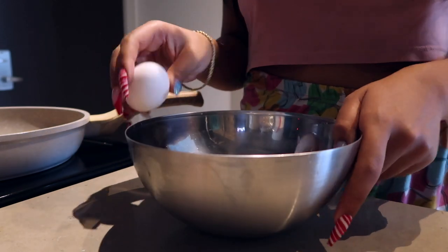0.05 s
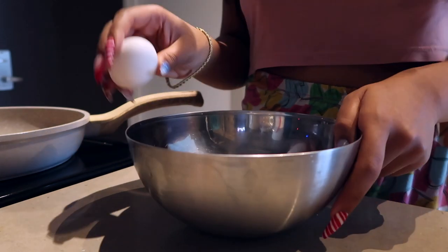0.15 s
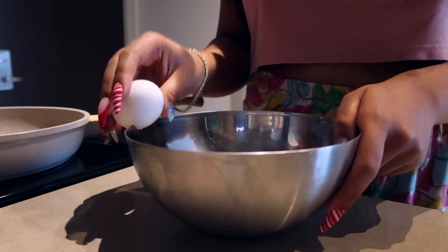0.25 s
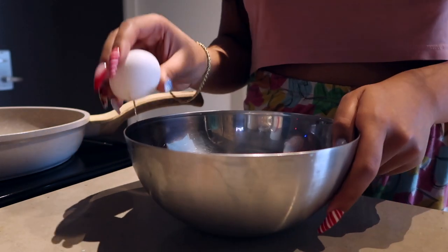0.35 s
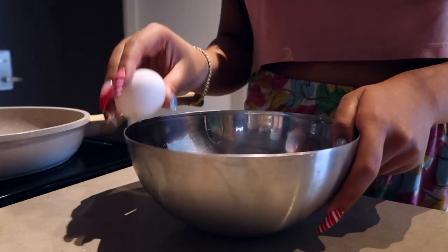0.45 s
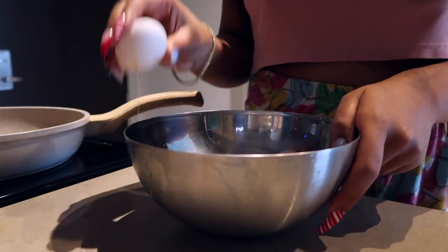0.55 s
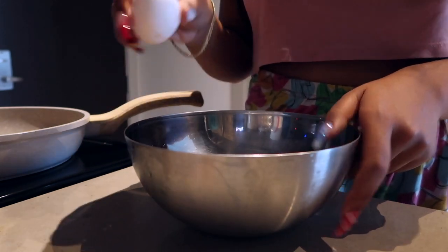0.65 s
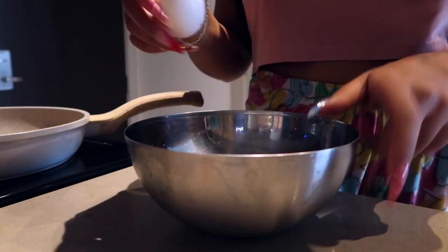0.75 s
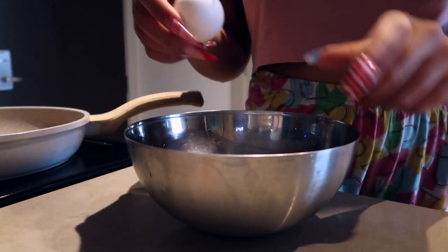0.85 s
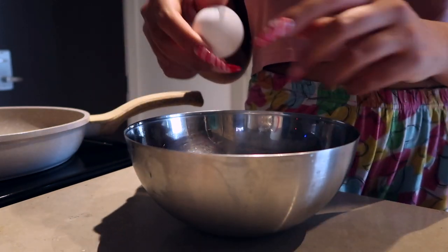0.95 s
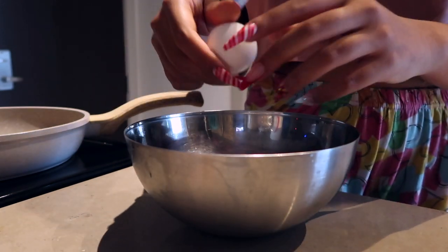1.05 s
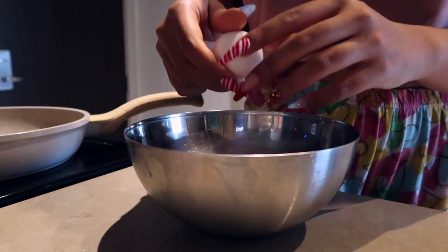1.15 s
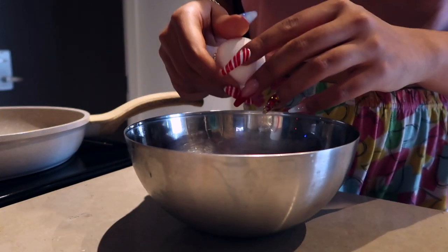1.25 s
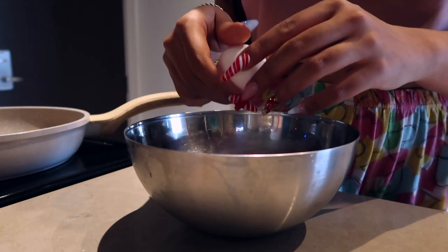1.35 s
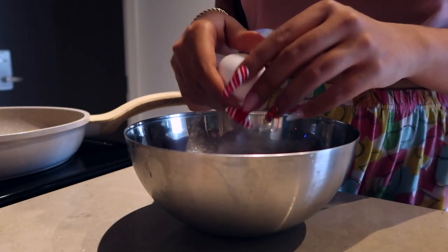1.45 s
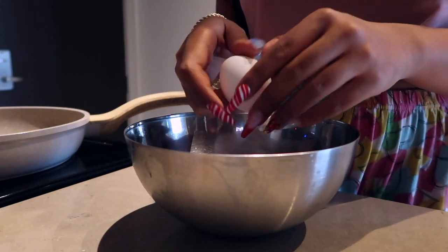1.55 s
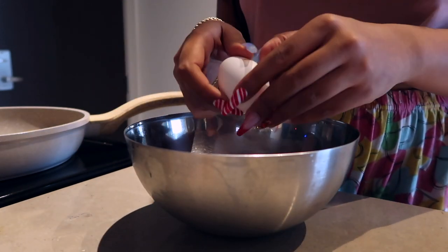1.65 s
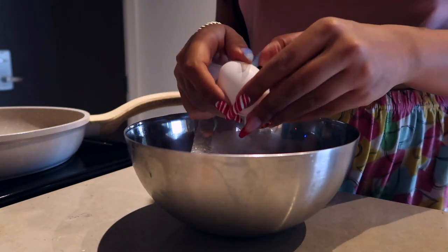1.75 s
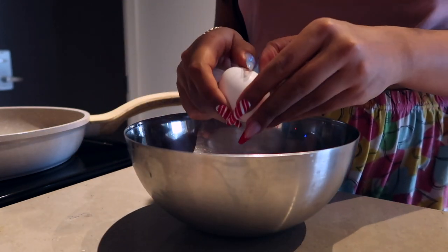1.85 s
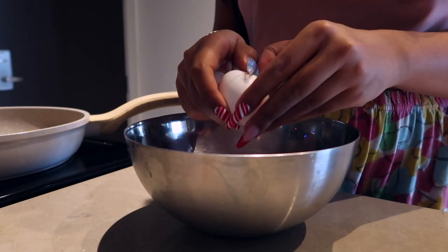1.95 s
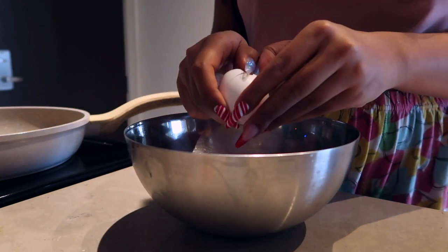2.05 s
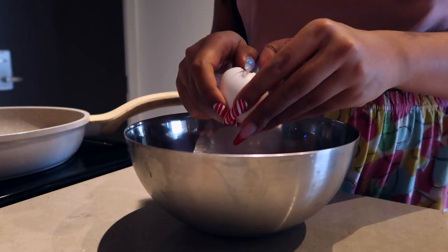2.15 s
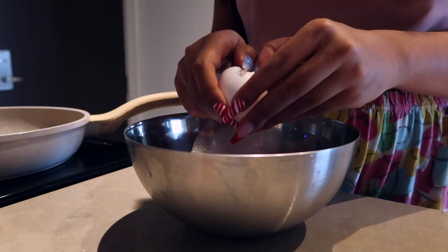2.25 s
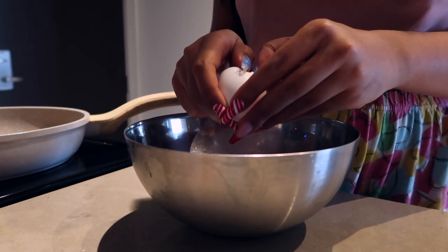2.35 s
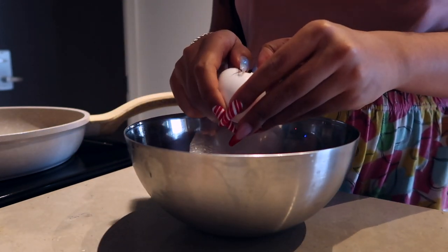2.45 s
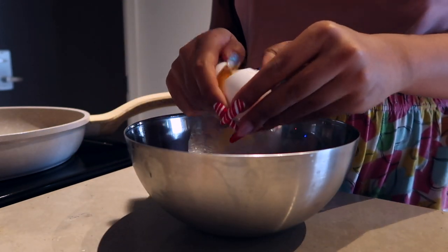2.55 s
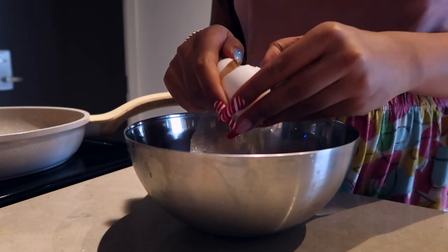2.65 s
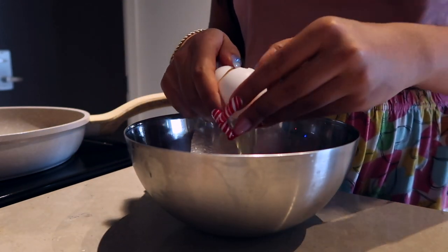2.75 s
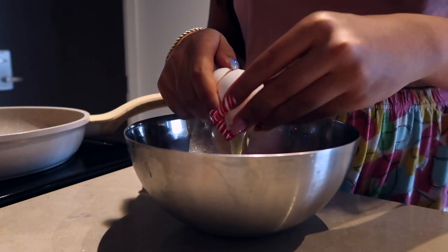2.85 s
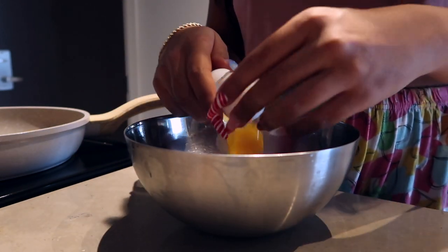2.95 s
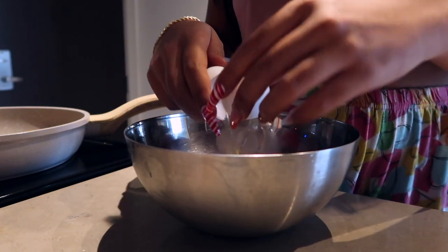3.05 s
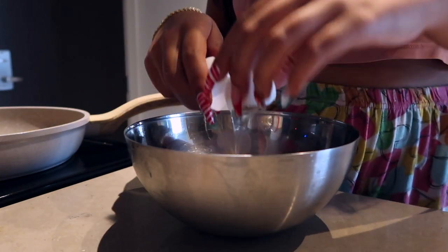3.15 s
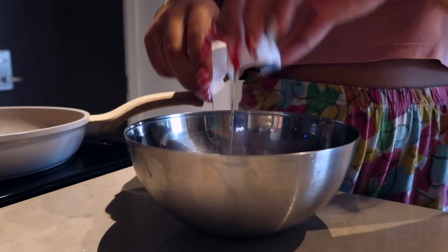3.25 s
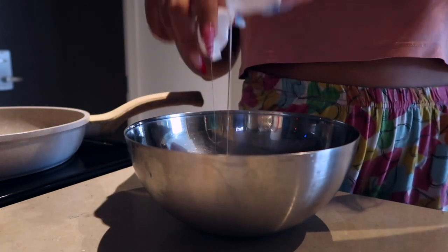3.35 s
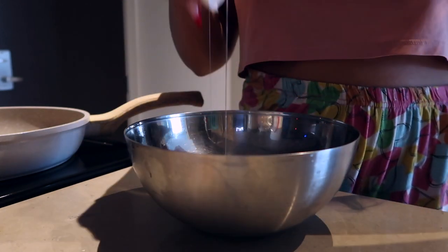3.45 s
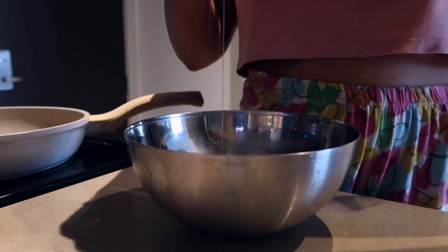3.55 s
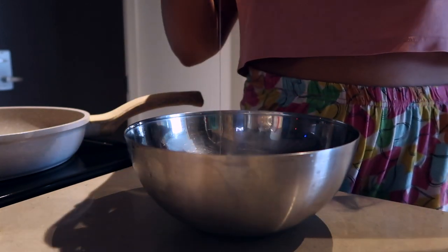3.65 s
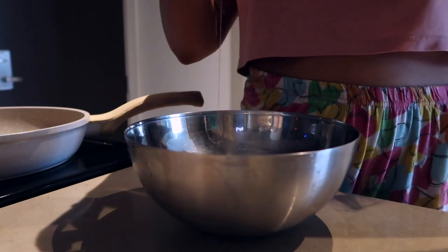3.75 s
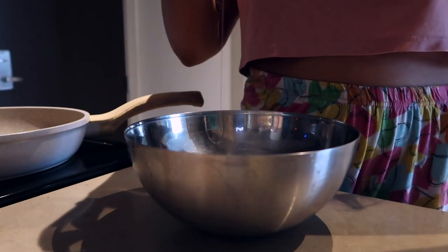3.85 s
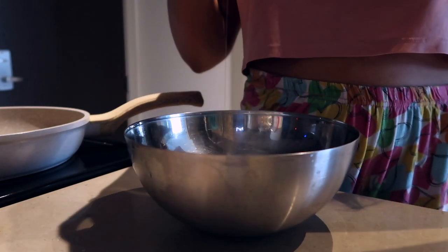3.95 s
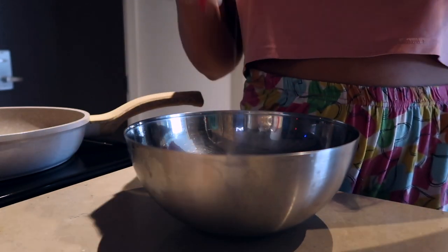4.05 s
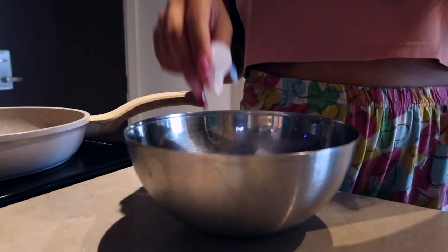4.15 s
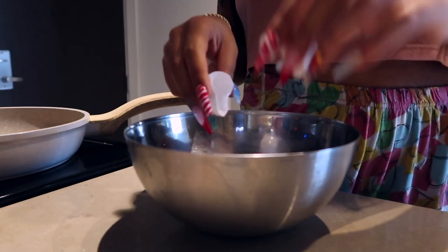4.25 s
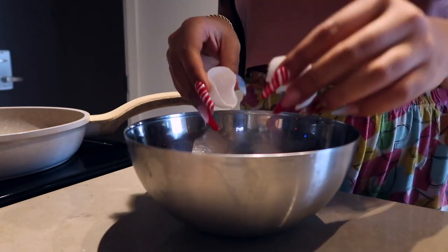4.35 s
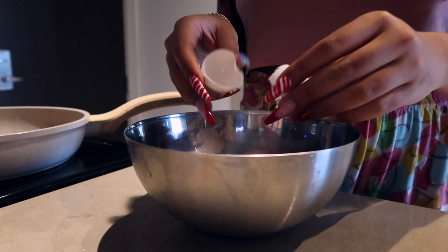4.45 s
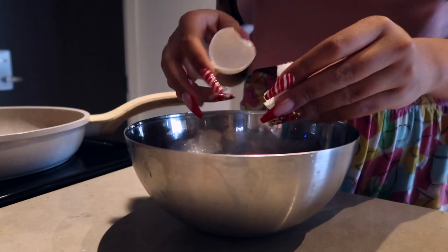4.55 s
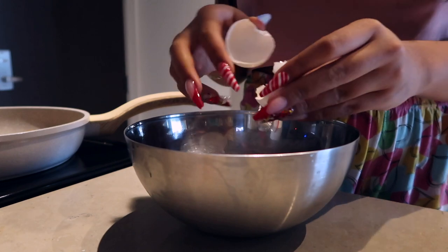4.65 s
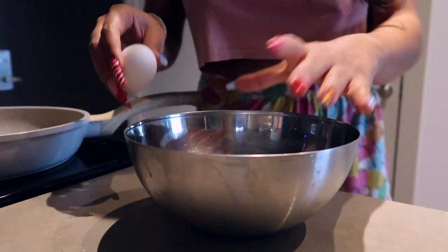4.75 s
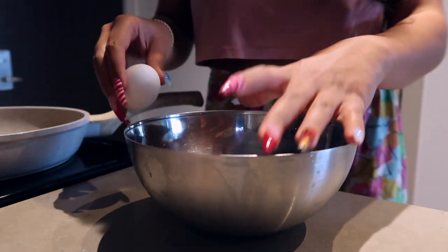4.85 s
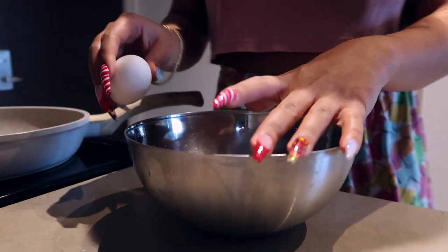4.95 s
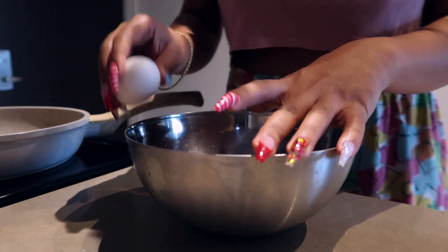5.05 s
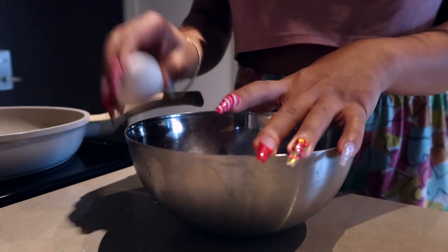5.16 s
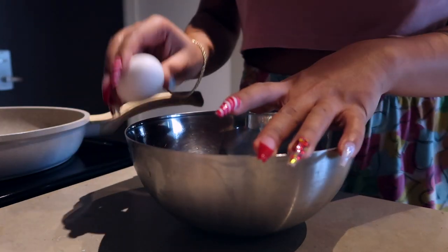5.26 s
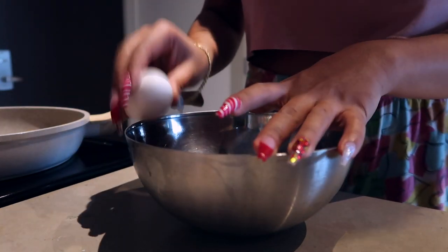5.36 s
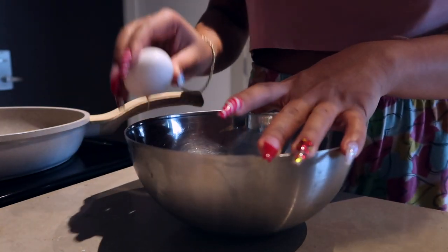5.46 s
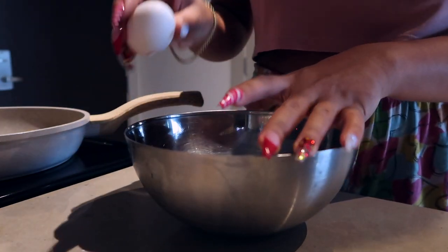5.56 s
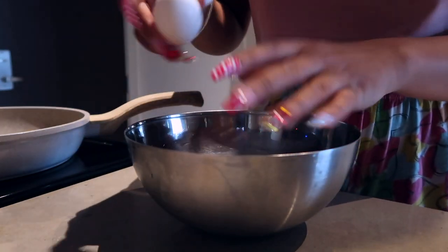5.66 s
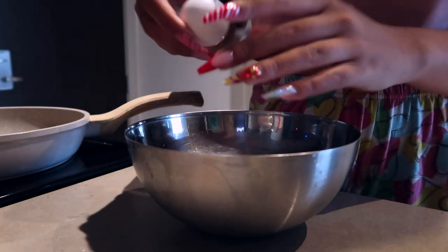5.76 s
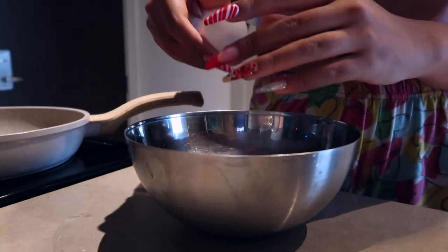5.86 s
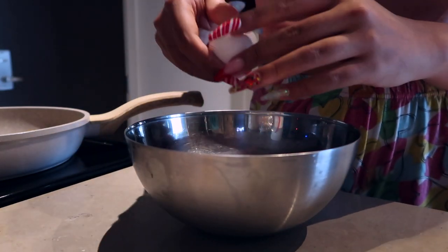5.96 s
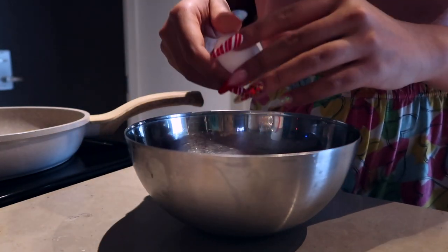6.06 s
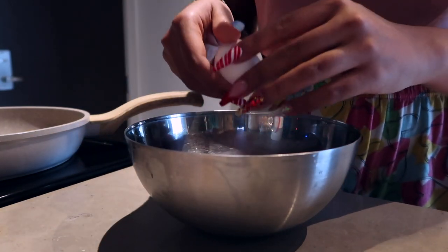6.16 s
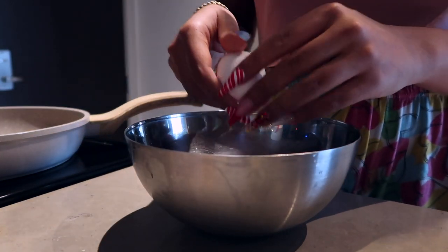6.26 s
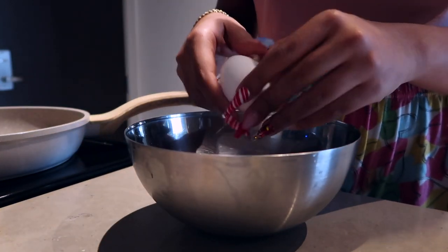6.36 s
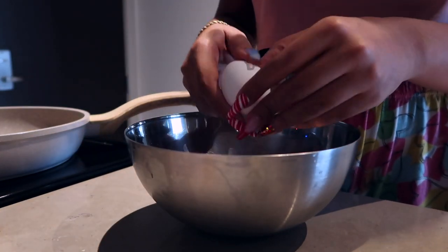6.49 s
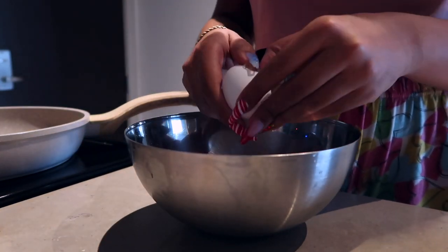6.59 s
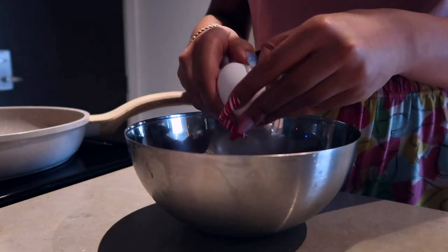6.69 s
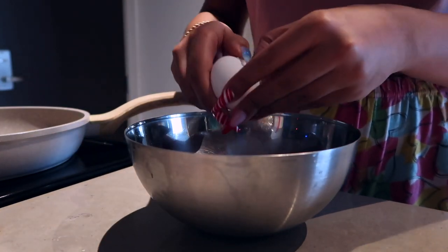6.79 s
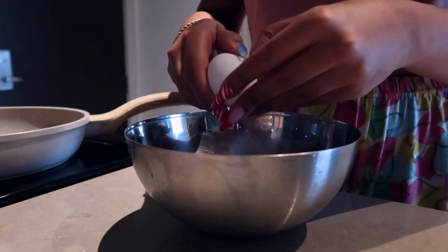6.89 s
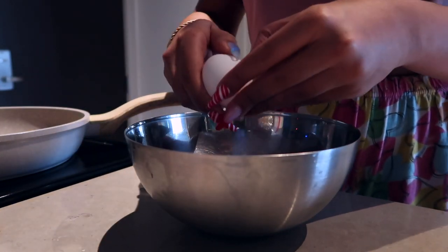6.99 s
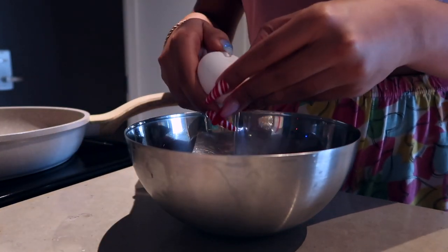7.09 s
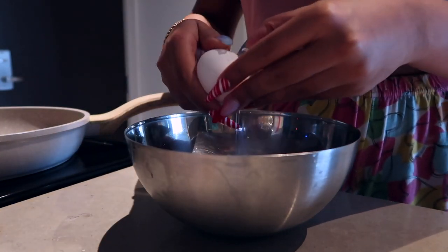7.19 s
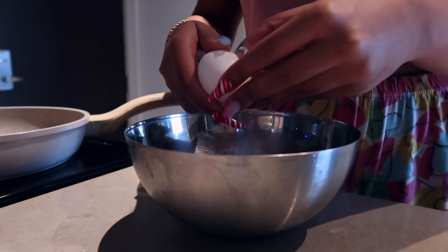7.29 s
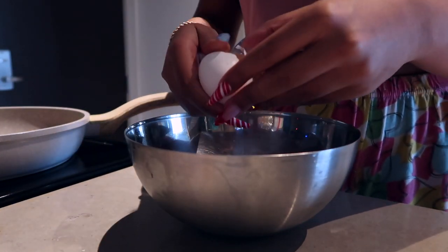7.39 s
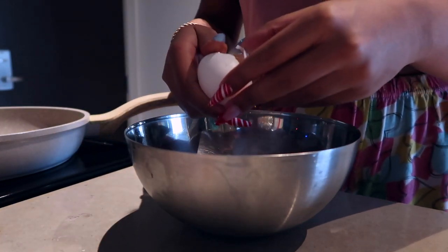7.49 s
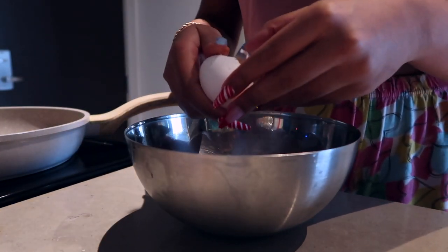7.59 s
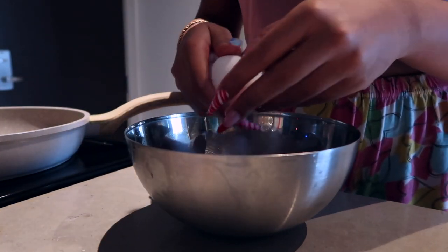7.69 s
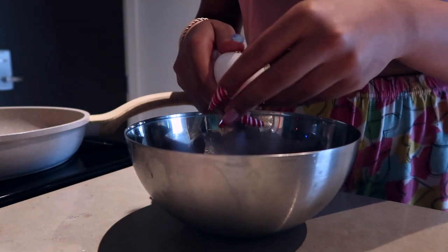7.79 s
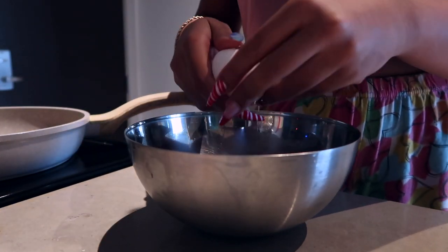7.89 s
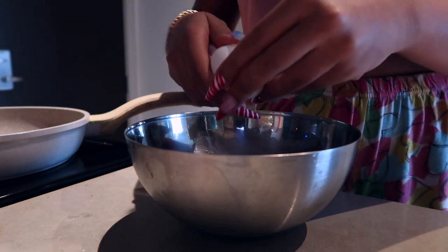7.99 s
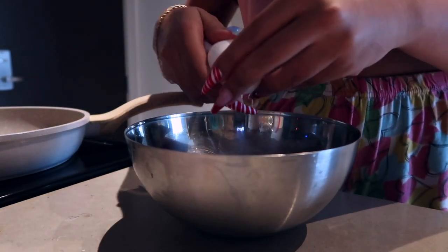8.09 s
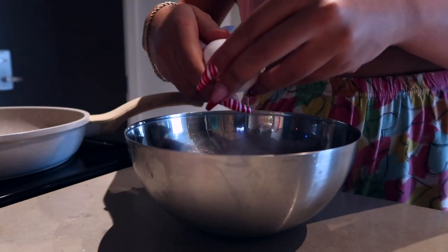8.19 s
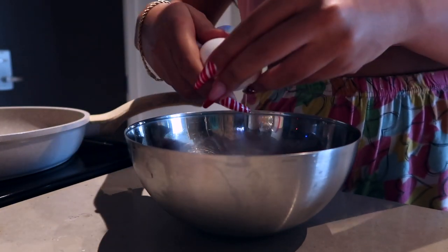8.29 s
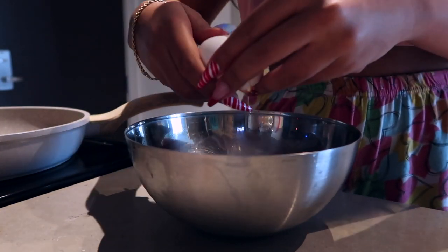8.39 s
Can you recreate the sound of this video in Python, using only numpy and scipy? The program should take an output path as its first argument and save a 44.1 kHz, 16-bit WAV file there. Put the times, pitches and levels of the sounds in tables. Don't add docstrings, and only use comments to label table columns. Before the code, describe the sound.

Eggs knock sharply on a steel bowl's rim, then shells snap, crackle and tear wetly open over a faint low kitchen hum.

```python
import sys
import numpy as np
from scipy import signal
from scipy.fft import rfft, irfft, next_fast_len
from scipy.io import wavfile
from scipy.ndimage import uniform_filter1d

SR = 44100
rng = np.random.default_rng(int(sys.argv[2]) if len(sys.argv) > 2 else 0)


def pcm_store(signal):
    levels = np.round(np.clip(np.atleast_2d(signal), -1, 1) * 32767)
    wavfile.write(sys.argv[1], SR, levels.astype(np.int16).T)


def makeup_ratio(level_db):
    decades = np.asarray(level_db, float) / 20
    return 10 ** decades


N = 371763

# f/Hz, likeness
LIKENESS = [(60, 1.0), (130, 1.0), (290, 0.93), (640, 0.7), (1410, 0.57), (3100, 0.47), (6820, -0.22),
            (15000, -0.51)]


def rms_one(x):
    return x / np.sqrt(np.mean(x ** 2) + 1e-20)


def peak_one(x):
    return x / np.max(np.abs(x))


def level(rows):
    return makeup_ratio(np.interp(np.arange(N) / SR, *np.transpose(rows), left=-200, right=-200))


def at_hz(points, hz):
    table_hz, values = np.transpose(points)
    return np.interp(np.log(hz), np.log(table_hz), values)


def shaped(x, spectrum):
    hz = np.fft.rfftfreq(N, 1 / SR) + 1
    return irfft(rfft(x) * makeup_ratio(at_hz(spectrum, hz)), N)


def band(x, low_hz, high_hz):
    return signal.sosfilt(signal.butter(2, [low_hz, high_hz], "band", fs=SR, output="sos"), x)


def cut_below(x, hz):
    return signal.sosfilt(signal.butter(4, hz, "high", fs=SR, output="sos"), x)


def ring(clicks, hz, t60):
    r, w = makeup_ratio(-60 / (t60 * SR)), 2 * np.pi * hz / SR
    return signal.lfilter([0, np.sin(w)], [1, -2 * r * np.cos(w), r * r], clicks + 1e-18)


def splinters(draw, seconds, rise_s=0.0022):
    t = np.arange(draw.shape[1]) / SR
    uneven = draw[0] * np.exp(0.55 * draw[1])
    spray = uneven * (1 - np.exp(-t / rise_s)) * np.exp(-t / max(seconds, 1e-4))
    return spray / np.sqrt(np.sum(spray ** 2))


def two_paths(voice, blow):
    straight = peak_one(voice(blow, 1))
    around = voice(np.arange(len(blow)) == 0, .45)
    return np.array([straight, around * np.sqrt(np.sum(straight ** 2) / np.sum(around ** 2))])


def add(out, s, sound):
    at = round(s * SR)
    out[:, at:at + sound.shape[1]] += sound[:, :N - at]


def squeezes(rows):
    t = np.arange(N) / SR
    return sum(makeup_ratio(db - 20 * np.maximum((s - t) / swell_s, (t - s) / fade_s)) for s, db, swell_s, fade_s in rows)


def narrow_noise(hz, width_hz, steady):
    bins = np.fft.fftfreq(N, 1 / SR)
    wander = np.fft.ifft(np.fft.fft(rng.standard_normal(N)) / (1 + (2 * bins / width_hz) ** 2))
    carrier = np.exp(2j * np.pi * hz * np.arange(N) / SR)
    return rms_one(np.real((wander + steady * wander.std()) * carrier))


def background():
    # f/Hz, level/dB per Hz
    air_colour = [(13, -47.5), (22, -11), (54, -15), (117, -9), (163, -3.5), (233, -11), (382, -16.5),
                  (414, -17.5), (502, -21.5), (1080, -26), (1820, -34), (4040, -38.5), (10800, -45.5),
                  (13100, -45.5), (15500, -78)]
    # f/Hz, width/Hz, steadiness, level before 4.77 s/dB, level after/dB
    hum_bands = [(28, 9.5, 3.0, -59, -57), (61, 5, 5.2, -49.5, -59.5), (116.2, 5, 2.2, -55.5, -53.5),
                 (173.3, 14, 1.56, -44.5, -44.5), (232, 17, 0.46, -48, -50), (301.5, 6, 1.4, -60.5, -56.5),
                 (422, 9, 1.1, -62, -61.5), (1070, 6.8, 6, -62, -61.5)]
    # t/s, level/dB
    drone = [(0.0, -59.5), (4.8, -57), (5.0, -43.5), (5.6, -41.5), (6.5, -41), (6.83, -79), (7.6, -50.5),
             (8.43, -44.5)]
    alike = np.clip(at_hz(LIKENESS, np.fft.rfftfreq(N, 1 / SR) + 1), -1, .975)
    mid, side = rfft([shaped(white, air_colour) for white in rng.standard_normal((2, N))])
    air = irfft(np.sqrt(1 + alike) * mid + np.sqrt(1 - alike) * side * [[1], [-1]], N)
    switch_s, glide_s = 4.77, 0.14
    after = np.clip((np.arange(N) / SR - switch_s) / glide_s, 0, 1)
    hum = level(drone) * narrow_noise(149.3, 3, 8.7)
    for hz, width_hz, steady, db, late_db in hum_bands:
        hum += makeup_ratio(db + (late_db - db) * after) * narrow_noise(hz, width_hz, steady)
    return makeup_ratio(-42) * rms_one(air) + hum


def snap_rows():
    # t/s, peak level/dB, shell ring f/Hz, hollow level/dB, tick level/dB
    prises = [(0.0569, -40.5, 2300, 11, -1.5), (0.113, -47.5, 1460, 23, -18.5), (1.4885, -52, 1610, -5, -6),
              (1.5696, -26.5, 2800, -3, -6), (1.5787, -23.5, 2550, -9, -6),
              (2.0505, -14.5, 2660, -8, -17.5), (2.2144, -47, 2590, 7, -9), (2.53, -42, 1560, 9, -4),
              (2.5729, -18.5, 2620, -0.5, -16), (2.5850, -19.5, 3200, 0, -7.5),
              (2.6, -12.5, 2650, -19.5, -21.5), (2.8393, -29, 1810, -5, -32),
              (2.9755, -20.5, 1810, -18, -30), (3.35, -41.5, 2740, -4.5, -13),
              (3.705, -45, 1830, -9, -13.5), (4.95, -42.5, 1480, 6, -12), (5.005, -21.5, 2660, -10, -30.5),
              (6.274, -38, 1720, 1, -13), (6.416, -33, 3340, 4.5, -21), (7.8435, -44, 3000, 0, -15),
              (7.9768, -30.5, 1780, -8, -29.5), (7.998, -20.5, 3430, -14, -14),
              (8.051, -23.5, 4000, -9.5, -16.5)]
    # t/s, peak level/dB, shell ring f/Hz
    dry_cracks = [(1.1915, -45.5, 2090), (1.427, -42, 3200), (1.68, -37, 2670), (1.8624, -31.5, 1840),
                  (2.2598, -34.5, 2630), (2.273, -38, 1740), (2.554, -30.5, 4420), (3.058, -33.5, 2190),
                  (3.111, -36.5, 1840), (3.2527, -38, 2220), (6.0767, -36.5, 3170), (6.1407, -45.5, 1720),
                  (6.2106, -41, 2300), (6.241, -41, 1710), (6.297, -34, 3000), (6.4015, -40.5, 3370),
                  (6.4555, -29.5, 2480), (6.6873, -45, 2630), (6.755, -33.5, 2700), (6.7765, -35, 2340),
                  (6.7913, -27.5, 3020), (7.015, -35.5, 2200), (7.186, -35.5, 2900), (7.927, -39.5, 3260),
                  (7.9722, -22.5, 2100), (8.2352, -38, 2000), (8.2745, -19, 2200), (8.2513, -33, 5260),
                  (8.3076, -22, 2300), (8.3255, -28, 2590)]
    # t/s, peak level/dB, shell ring f/Hz, splinter time/s
    torn = [(1.3524, -30.5, 1800, 0.003), (2.7615, -28, 3450, 0.0055), (1.9036, -39, 1790, .0015),
            (2.593, -5, 3170, 0.00059), (2.6064, -13, 2720, 0.004), (2.6682, -36, 2740, .0018),
            (2.725, -29, 2020, 0.0039), (2.813, -40, 1860, 0.001), (2.91, -20.5, 1870, 0.0034),
            (2.9656, -15, 1716, 0.0085), (3.0213, -20, 2350, 0.0021), (3.0805, -27.5, 1680, 0.0018),
            (3.236, -31.5, 2270, 0.0049), (3.2933, -37.5, 2800, .0015), (3.546, -36.5, 2440, .0012),
            (3.567, -38, 2650, .0014), (3.632, -40.5, 2350, .0015), (3.6488, -39, 2730, 0.0017),
            (5.0795, -41.5, 4900, 0.0011), (7.0506, -23.5, 3420, 0.0028), (7.072, -31, 3180, .0018),
            (7.268, -38, 1820, .0022), (8.037, -28.5, 1780, 0.00082), (8.2674, -22, 1810, 0.0014),
            (8.3401, -13.5, 3360, 0.0014), (8.3604, -20, 3290, 0.0016), (8.383, -30.5, 3120, 0.0031),
            (8.3928, -16, 3310, 0.0029), (8.2925, -12, 2240, 0.0013), (8.418, -22, 2100, 0.002)]
    # t/s, peak level/dB, shell ring f/Hz
    wet = [(2.6444, -26, 2060), (2.691, -24.5, 2040), (1.7404, -40, 1730), (2.7806, -35, 3260),
           (3.145, -29.5, 2800), (4.496, -25, 3050), (6.8125, -30, 2600), (7.0378, -20.5, 3520),
           (7.059, -19, 3250), (7.0914, -42, 3570), (7.123, -34, 2050), (7.171, -29, 1610),
           (7.203, -32, 1490), (7.338, -23.5, 1810), (7.365, -31, 1880), (7.418, -33.5, 1710),
           (7.514, -33, 1780), (7.537, -30, 1820), (7.559, -36, 1900), (7.716, -27, 2060),
           (7.7295, -28.5, 1740), (7.7651, -18, 1840), (8.372, -33, 3240), (8.2825, -22, 2310),
           (8.407, -12, 2990)]
    faint_db = -26.5
    return ([(*row, 0.0042) for row in prises]
            + [(*row, faint_db, -12, 0.0047) for row in dry_cracks]
            + [(s, db, hz, faint_db, -25, splinter_s) for s, db, hz, splinter_s in torn]
            + [(*row, faint_db, -43, 0.0023) for row in wet])


def snaps():
    # f/Hz, t60/s, level/dB
    hollow_modes = [(496, 0.29, -7.5), (560, 0.049, -2), (749.5, 0.088, 2)]
    # f/Hz, t60/s, level/dB
    egg_modes = [(1750, 0.037, -27.5), (2660, 0.013, -28.5), (3300, 0.0077, -25), (4800, 0.0012, -31.5),
                 (6110, 0.0038, -32.5)]
    rise_s = .0004
    scatter_db = 2.5
    out, rows = np.zeros((2, N)), snap_rows()
    for s, db, hz, hollow_db, tick_db, splinter_s in rows:
        draw = rng.standard_normal((3, 3000))
        blow, grit = splinters(draw, splinter_s, rise_s), splinters(draw[1:], splinter_s, rise_s)
        cycles = 24 + max(-24 - tick_db, 0)

        def shell_voice(x, sharp):
            return band(ring(x, hz, sharp * cycles / hz), .75 * hz, 1.4 * hz)

        def hollow_voice(x, sharp):
            return sum(makeup_ratio(d + scatter_db * chance) * ring(x, f, sharp * t60)
                       for (f, t60, d), chance in zip(hollow_modes, draw[2]))

        def crack_voice(x, sharp):
            body = sum(makeup_ratio(d) * ring(x, f, sharp * t60) for f, t60, d in egg_modes)
            return cut_below(band(x, 1400, 5000) + body, 1800)

        snap = two_paths(shell_voice, blow) + makeup_ratio(hollow_db) * two_paths(hollow_voice, blow)
        snap += makeup_ratio(0.58 * tick_db + 11.0) * two_paths(crack_voice, grit)
        snap += makeup_ratio(tick_db + 12.5) * two_paths(lambda x, sharp: band(x, 3600, 14000), grit)
        add(out, s, makeup_ratio(db - 4.0) * snap)
    return cut_below(out, 320)


def knocks():
    # t/s, level/dB, crush time/s, crack level/dB, crack top f/Hz
    rim_knocks = [
        (.3002, 4.5, 0.00096, 0.5, 5840),
        (5.2390, -0.5, 0.0013, -21.5, 7000),
        (5.4222, -5, 0.0067, -29, 4600),
    ]
    # f/Hz, t60/s, level/dB at knocks 1, 2 and 3
    bowl_modes = [(553, 0.032, -11, -5.5, -4), (387, 0.088, -19, -22.5, -23), (470, .04, -5, -10, -16),
                  (657, 0.033, -13.5, -5, -9), (786, 0.069, -8.5, -4.5, -33), (842, 0.045, -11, -8.5, -22),
                  (990, 0.023, -7.5, -10.5, -15.5), (1320, 0.0078, -4.5, -10.5, -8.5),
                  (1810, 0.019, 0, -2, -5.5), (2100, 0.014, -2, 1.5, -4.5), (2820, 0.013, -16, 0.5, -8),
                  (3280, 0.016, -12, -8.5, -11), (3920, 0.018, -10, -1, -29), (5420, .005, -16, -8, -14),
                  (8980, 0.0081, -11, -8.5, -13.5)]
    out = np.zeros((2, N))
    for k, (s, db, crush_s, crack_db, top_hz) in enumerate(rim_knocks):
        blow = splinters(rng.standard_normal((2, 6000)), 0.33 * crush_s)
        parts = [makeup_ratio(crack_db) * two_paths(lambda x, sharp: band(x, 1100, top_hz), blow)]
        for hz, t60, *mode_db in bowl_modes:
            low = hz < 1100
            blow = splinters(rng.standard_normal((2, 6000)), crush_s)
            blow = np.roll(blow, int(0.00059 * SR) * low)
            held_s = min(t60, (60 if low else 26) / hz)
            mode = two_paths(lambda x, sharp: ring(x, hz, sharp * held_s), blow)
            parts.append(makeup_ratio(mode_db[k]) * mode)
        straight, around = np.swapaxes(parts, 0, 1)
        spread = irfft(np.sqrt(np.sum(np.abs(rfft(around)) ** 2, 0)))
        add(out, s, makeup_ratio(db) * np.array([straight.sum(0), np.roll(spread, 130)]))
    return cut_below(out, 330) + band(out, 50, 180)


def clean_breaks():
    # t/s, peak level/dB, low ring f/Hz, high ring f/Hz, high ring level/dB
    breaks = [(0.3006, -8, 1670, 1292, -9), (1.5712, -17, 725, 1770, -3.5), (1.5800, -28, 775, 3300, 9.5),
              (1.8629, -24.5, 1780, 2660, 4.5), (1.9040, -34, 2600, 3300, -3),
              (2.0508, -21.5, 722, 2710, 6), (2.5525, -23.5, 4130, 5200, -1), (2.5870, -21, 636, 3100, 7),
              (2.594, -6, 2820, 3300, -1), (2.6, -13, 2540, 2900, 2), (2.608, -12, 2560, 2980, -1),
              (2.6300, -21, 2900, 3300, -2), (2.638, -26, 2800, 2500, -4), (2.6600, -26, 2300, 2700, 1),
              (2.7630, -23.5, 1850, 3520, 2), (2.7830, -29, 2000, 3400, -4),
              (2.8385, -29.5, 1740, 2900, 4.5), (4.4973, -25, 2950, 3400, 2.5),
              (5.2395, -7, 720, 2100, -4.5), (5.4222, -18.5, 620, 3010, 2), (7.1135, -27.5, 2000, 2180, -8),
              (7.1185, -15.5, 2020, 2200, -12), (7.166, -21.5, 1720, 2100, -7),
              (8.2633, -7, 1810, 2100, 0.5), (8.275, -23, 2100, 3100, -3), (8.282, -22, 2190, 2500, -3),
              (8.291, -4, 2194, 3400, 0.5), (8.3080, -24, 2200, 3000, -3), (8.3260, -27, 2500, 3000, -2),
              (8.3405, -21, 3200, 2800, -6), (8.36, -21, 3200, 3900, 1), (8.3685, -12, 3180, 2720, -4),
              (8.3797, -13, 3100, 2400, -7), (8.3899, 0.5, 3190, 2850, -5), (8.4058, -11, 3040, 2600, -7.5),
              (8.4136, -1, 2075, 3220, -10), (8.4165, -9, 2075, 2400, -9.5)]
    rebound_s, longest_s = .0011, 0.035
    out, blow = np.zeros((2, N)), np.zeros(2500)
    blow[[0, round(rebound_s * SR)]] = 1, -.6
    crack = makeup_ratio(-9) * two_paths(lambda x, sharp: band(band(x, 2300, 6200), 1500, 9000), blow)

    def piece(hz):
        t60 = min(40 / hz, longest_s)
        return two_paths(lambda x, sharp: band(ring(x, hz, sharp * t60), 0.77 * hz, 1.5 * hz),
                         np.arange(2500) == 0)

    for s, db, low_hz, high_hz, high_db in breaks:
        high = piece(high_hz) + crack * (high_hz > 2300)
        add(out, s, makeup_ratio(db - 6) * (piece(low_hz) + makeup_ratio(high_db) * high))
    return out


def shards():
    # t/s, peak level/dB, low edge f/Hz, high edge f/Hz
    thin_shards = [(2.7010, -38, 2200, 4500), (2.7240, -31, 2500, 4500), (2.7560, -34, 1600, 4500),
                   (2.8393, -29, 2700, 4200), (2.9075, -21, 1700, 4000), (2.9114, -20, 2200, 5500),
                   (2.9660, -17, 2230, 4200), (2.9770, -18.5, 2380, 4200), (3.0202, -25, 2000, 4500),
                   (6.7520, -39, 2122, 3600), (6.7930, -34, 2400, 3600), (6.8130, -26, 2200, 3600),
                   (7.0170, -30, 2000, 2900), (7.1660, -28.5, 2000, 4500), (7.2060, -34, 1500, 3300),
                   (7.7657, -28, 3000, 7500), (7.9020, -44, 2200, 3800), (7.9635, -29, 1800, 4200),
                   (7.9685, -20.5, 1800, 4500), (7.973, -27, 2000, 4800), (7.9975, -13, 1700, 5000),
                   (8.0395, -40, 2800, 4000), (8.051, -27, 2000, 6200), (8.2745, -26, 3500, 7000),
                   (8.2912, -10, 3400, 5900), (8.3090, -27, 3200, 7000), (8.3405, -26, 3500, 7000),
                   (8.3685, -19, 2600, 4800), (8.3901, -6, 3600, 6200), (8.4136, -13.5, 3200, 5500),
                   (5.4223, -16, 2300, 3500), (0.3008, -13.5, 5020, 7500), (0.3012, -22.5, 8930, 15000),
                   (5.2398, -19.5, 8000, 15000), (5.2430, -24.5, 8000, 15040), (5.4240, -28, 8000, 15000),
                   (3.0220, -38, 9000, 15000), (3.0590, -40, 8500, 15000), (7.1880, -39, 8950, 15000),
                   (8.2640, -25, 9000, 15500), (8.3905, -21, 9000, 15500), (8.2845, -33, 9000, 15500),
                   (4.955, -45.5, 5800, 8000), (8.2920, -25, 8000, 15000), (2.5870, -24, 3500, 6000),
                   (2.6050, -26, 3500, 6500), (2.6130, -25, 3000, 5500), (2.5420, -39, 4500, 5800),
                   (7.1600, -39.5, 2800, 3400), (8.3795, -22, 2410, 3600),
                   (2.594, -9, 2400, 4600), (3.548, -40, 2200, 3200), (3.569, -41, 2300, 3300),
              (3.634, -42, 2200, 3200), (7.515, -40, 3000, 8000), (7.929, -38, 2500, 6500),
              (0.301, -16, 950, 1400)]
    run_on_s = 0.0024
    out, blow = np.zeros((2, N)), np.zeros(1500)
    blow[[0, round(run_on_s * SR)]] = 1, 0.53
    for s, db, low_hz, high_hz in thin_shards:
        crack = two_paths(lambda x, sharp: band(band(x, low_hz, high_hz), low_hz, high_hz), blow)
        add(out, s, makeup_ratio(db) * crack)
    return out


def lasting_rings():
    # t/s, level/dB, f/Hz, t60/s
    thin_rings = [(0.303, -26, 484, 0.33), (0.303, -32, 705, 0.35), (0.303, -30, 791, 0.54),
                  (0.302, -32, 1194, 0.33), (0.302, -36, 1647, 0.5), (0.302, -38, 2013, 0.4),
                  (0.302, -40, 3208, 0.4), (1.572, -31, 1710, 0.025), (2.0515, -27, 3300, 0.028),
                  (4.498, -46.5, 2643, 0.24), (5.005, -49, 2645, 0.45), (5.0044, -38.5, 5630, 0.034),
                  (5.241, -28, 2046, 0.33), (5.241, -32, 2826, 0.35), (5.241, -34, 1093, 0.4),
                  (5.241, -36, 3330, 0.28), (5.241, -36, 3542, 0.25), (5.425, -35, 1647, 0.4),
                  (5.425, -39, 3009, 0.3), (5.425, -38, 1093, 0.5), (5.425, -37, 2331, 0.24)]
    # t/s, level/dB, f/Hz, t60/s
    split_rings = [(2.9655, -22.5, 1740, 0.081), (2.0515, -31, 800, 0.067), (1.5805, -25, 1780, 0.036),
                   (7.168, -32, 1560, 0.12), (7.064, -34.5, 3500, 0.092), (7.07, -39, 3250, .14),
                   (5.004, -32, 2640, 0.13), (2.7635, -43, 3700, 0.085), (5.005, -50.5, 7400, 0.17),
                   (5.4235, -11.5, 400, 0.095), (8.0515, -36.5, 500, 0.042), (1.572, -30.5, 597, 0.028),
                   (1.43, -56, 4200, 0.15), (1.864, -45, 2600, 0.1), (2.1, -45, 2640, 0.19),
                   (3.6490, -42.5, 2610, 0.12), (5.004, -43, 3128, 0.2), (5.0045, -39.5, 1700, 0.097),
                   (5.2408, -33, 2374, 0.26), (5.242, -29, 411, 0.21), (5.445, -29.5, 340, 0.33),
                   (5.2432, -34, 740, 0.3), (2.575, -30, 500, 0.088)]
    out, click = np.zeros((2, N)), np.eye(1, SR // 2)
    for s, db, hz, t60 in thin_rings:
        add(out, s, makeup_ratio(db) * ring(click, hz, t60))
    for s, db, hz, t60 in split_rings:
        beating = sum(ring(click, hz * (1 + 0.0362 * k), t60) for k in (-1, 0, .6))
        add(out, s, makeup_ratio(db - 6) * beating)
    return cut_below(out, 320)


def crunch():
    # t of peak/s, level/dB, swell/s per 20 dB, fade/s per 20 dB
    thumbs = [(1.55, -62, .5, .3), (2.27, -59, 0.32, 0.064), (2.62, -49, 0.14, 0.84),
              (2.67, -49, 0.1, 0.15), (3.0, -60, 0.12, 0.2), (6.291, -52.5, 0.29, 0.042),
              (6.42, -56, 0.091, 0.22), (6.79, -44, 0.091, .08), (7.06, -50, 0.12, 0.21),
              (7.2, -64, 0.18, 0.037), (7.78, -45, 0.1, 0.052), (8.0, -39.5, 0.051, 0.086),
              (8.28, -36.5, 0.059, 0.26), (8.42, -29.5, 0.067, .3)]
    # f/Hz, level/dB per Hz
    grain_colour = [(590, -42), (1000, -33.5), (1410, -14), (1730, 6), (1940, 1), (2130, 8), (3180, 1),
                    (4340, 0), (13200, -27.5), (15500, -50)]
    # t of peak/s, level/dB, swell/s per 20 dB, fade/s per 20 dB
    fizz = [(2.59, -60, 0.04, 0.06), (3.05, -60, 0.15, 0.15), (8.28, -51, 0.04, 0.4), (8.4, -54, 0.05, 0.2)]
    hits = rng.random(N) < 1500 / SR
    grains = hits * rng.standard_normal(N) * makeup_ratio(1.5 * np.minimum(rng.exponential(1, N), 4))
    shell = squeezes(thumbs) * rms_one(shaped(grains, grain_colour))
    return shell + squeezes(fizz) * rms_one(band(grains, 10500, 15500))


def wipe():
    # t/s, level/dB
    stroke = [(4.74, -85), (4.76, -46), (4.83, -48), (4.9, -53.5), (5.0, -72.5)]
    return level(stroke) * rms_one(band(rng.standard_normal(N), 1498, 4500))


def squeak():
    start_s, length_s, edge_s, pop_s = 6.83, 0.29, 0.0089, 0.0074
    t = np.arange(N) / SR - start_s
    held = np.clip(np.minimum(t, length_s - t) / edge_s, 0, 1)
    pop_db = 4 * np.exp(-np.maximum(t - edge_s, 0) / pop_s)
    return held * makeup_ratio(-55.5 + pop_db) * narrow_noise(3400, 70, 2.2)


def kitchen(x):
    # f/Hz, t60/s, level/dB
    room_bands = [(295, 0.24, -7), (705, 0.36, -12.5), (1170, 0.53, -14.5), (2350, 0.38, -16.5),
                  (4800, 0.51, -15), (8840, 0.22, -5), (15150, .1, -36)]
    # f/Hz, phase/rad
    port_phase = [(1200, 0.029), (3100, 0.072), (4500, 1.5), (7500, 0.94), (10500, 2.14), (15000, 1)]
    t, size = np.arange(SR - 1) / SR, next_fast_len(N + SR)
    octave = np.log2(np.fft.rfftfreq(len(t), 1 / SR) + 1)
    hz = np.fft.rfftfreq(size, 1 / SR) + 1
    noise = rng.standard_normal((2, len(t)))
    white, tail = rfft(noise), 0
    lump_size, unevenness = round(0.008 * SR), 0.3
    lumps = rms_one(uniform_filter1d(uniform_filter1d(noise[0], lump_size), lump_size))
    for centre_hz, t60, db in room_bands:
        echo = irfft(white * np.clip(1 - abs(octave - np.log2(centre_hz)), 0, 1), len(t))
        echo = echo * np.exp(unevenness * np.roll(lumps, round(centre_hz)) - unevenness ** 2)
        decay = makeup_ratio(db - 60 * t / t60) + makeup_ratio(db - 14.5 - 30 * t / t60)
        tail = tail + echo * decay / np.sqrt(t60 * SR / 14)
    onset = 1 - np.exp(-(t / 0.00049) ** 2)
    mid, side = rfft(tail * onset, size)
    alike = np.clip(at_hz(LIKENESS, hz) + 0.35, -1, .99)
    diffuse = np.sqrt(1 + alike) * mid + np.sqrt(1 - alike) * side * [[1], [-1]]
    direct = np.exp(.5j * at_hz(port_phase, hz) * np.array([[1], [-1]]))
    straight, around = rfft(x, size)
    return irfft(straight * direct + around * diffuse, size)[:, :N]


def scene():
    shell = snaps() + clean_breaks() + shards() + crunch()
    return kitchen(shell + knocks() + lasting_rings() + wipe() + squeak()) + background()


def band_limit(x):
    return signal.sosfilt(signal.butter(12, 15900, fs=SR, output="sos"), x)


def record(dry):
    t = np.arange(N) / SR
    loud_db = 10 * np.log10(uniform_filter1d(np.mean(dry ** 2, 0), size=441) + 1e-12)
    over_db = 0.36 * np.maximum(loud_db + 22.5, 0)
    held_db = np.maximum(np.maximum.accumulate(over_db + 7.42 * t) - 7.46 * t, 0)
    r = np.exp(-1 / (0.029 * SR))
    ducked = dry * makeup_ratio(-signal.lfilter([1 - r], [1, -r], held_db))
    top_cut = signal.cheby2(10, 50, 16300, fs=SR, output="sos")
    mix = signal.sosfilt(top_cut, np.clip(ducked, -.95, .95))
    return band_limit(mix)


dry = scene()
out = record(dry)
pcm_store(out)
```